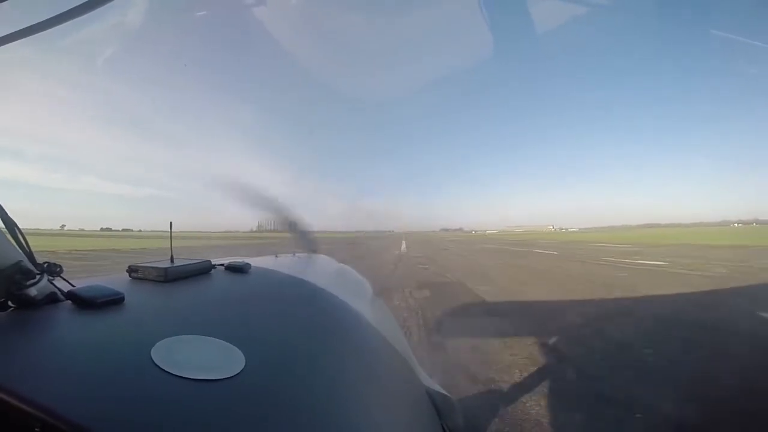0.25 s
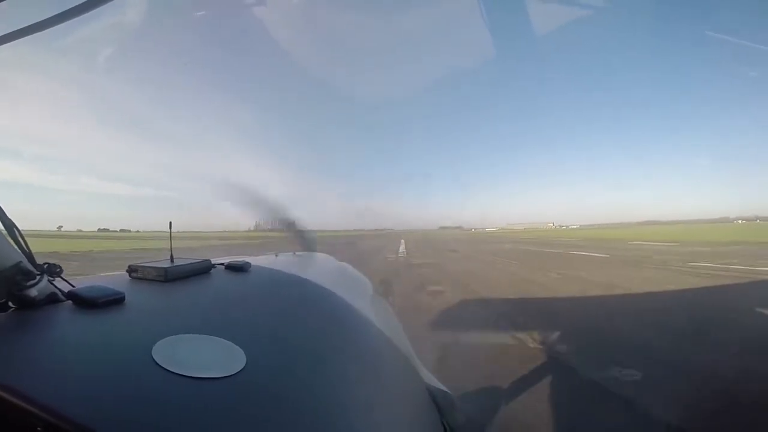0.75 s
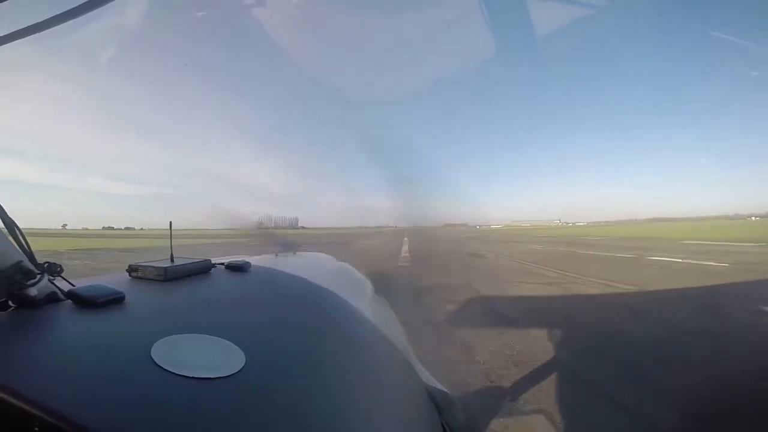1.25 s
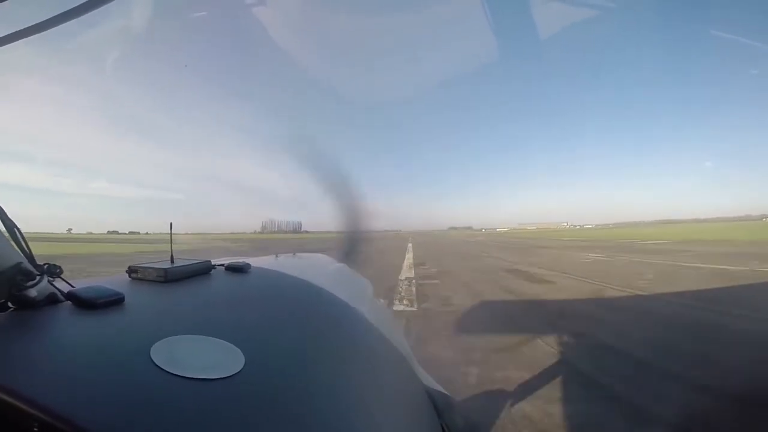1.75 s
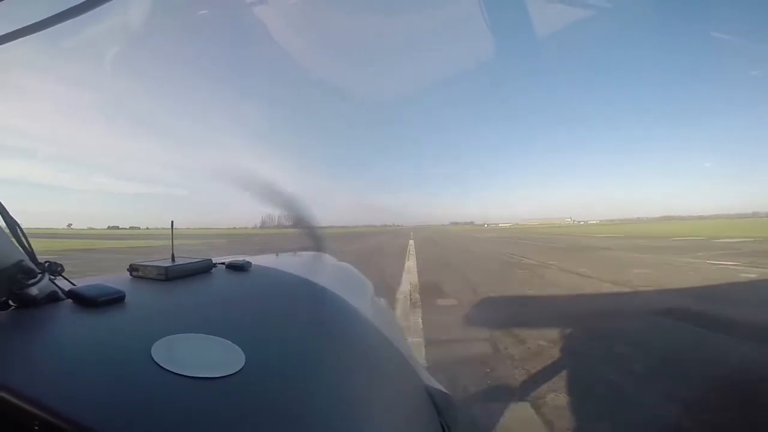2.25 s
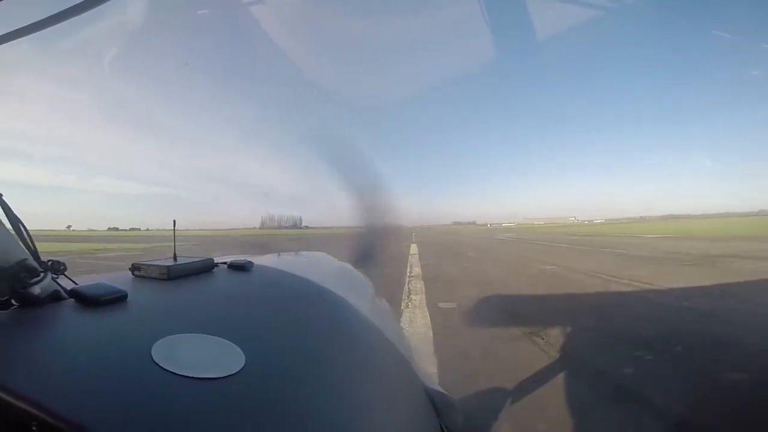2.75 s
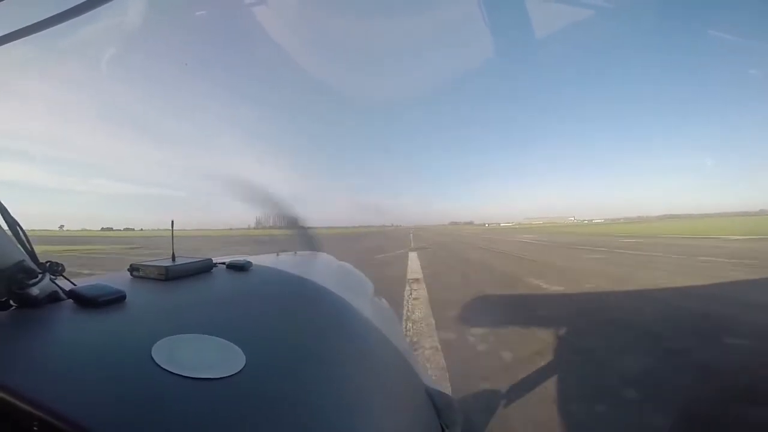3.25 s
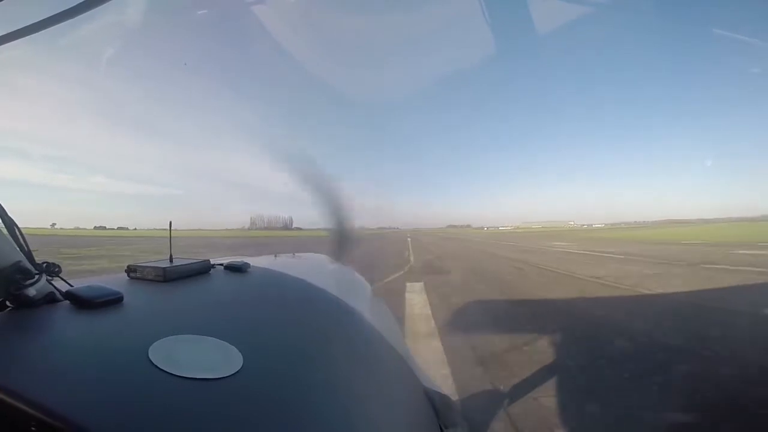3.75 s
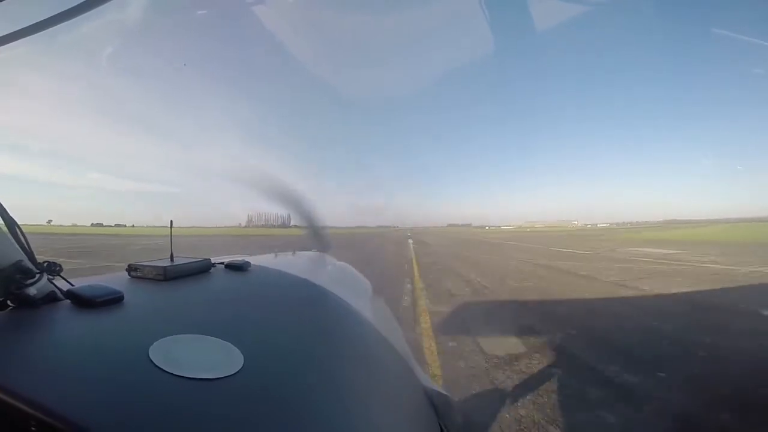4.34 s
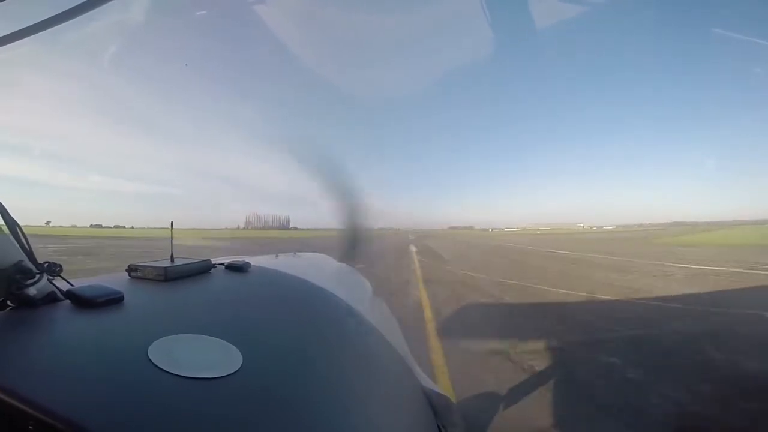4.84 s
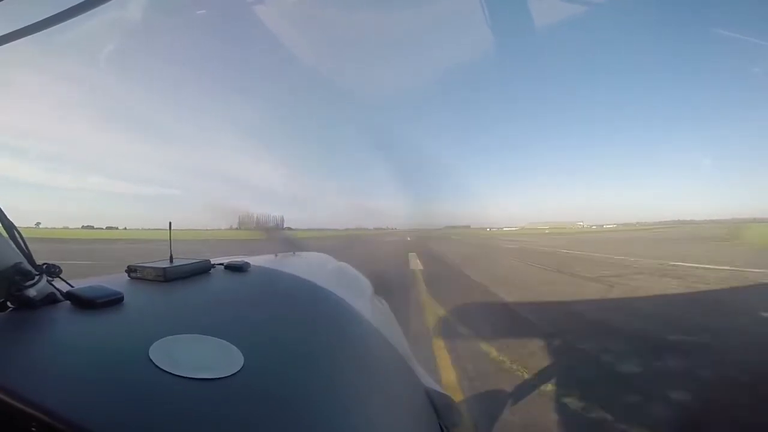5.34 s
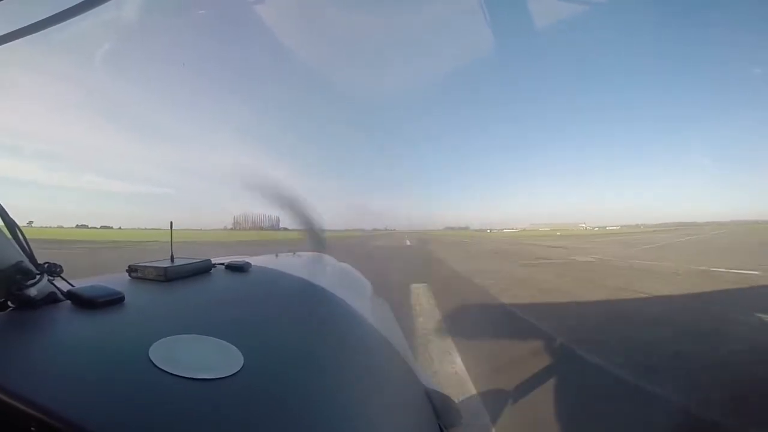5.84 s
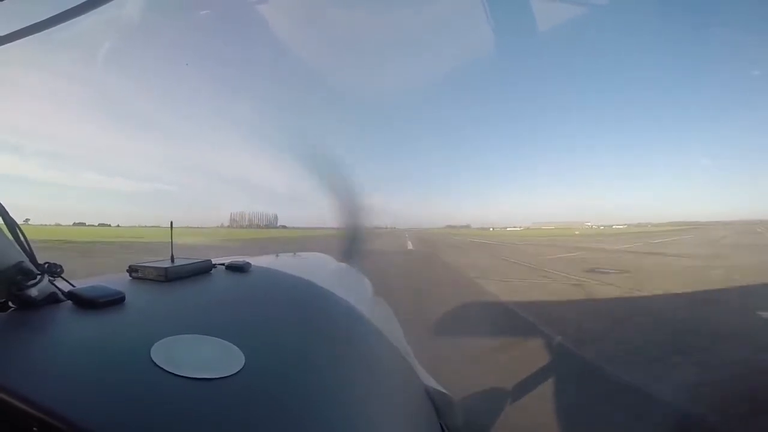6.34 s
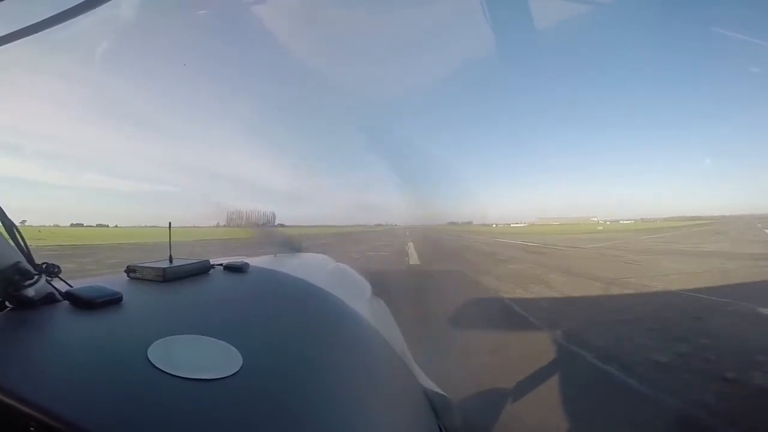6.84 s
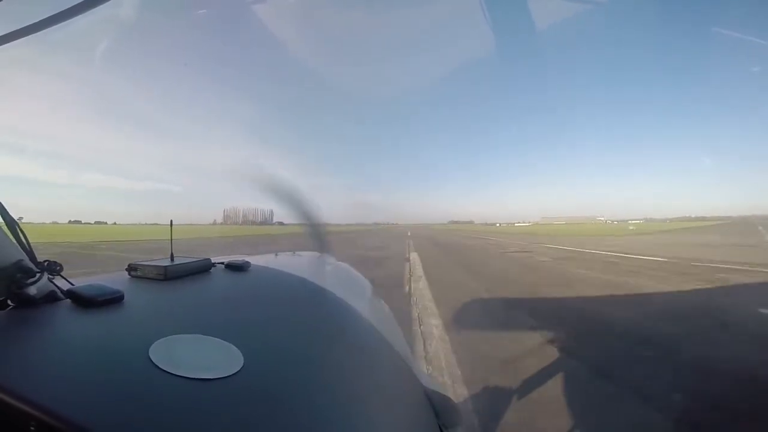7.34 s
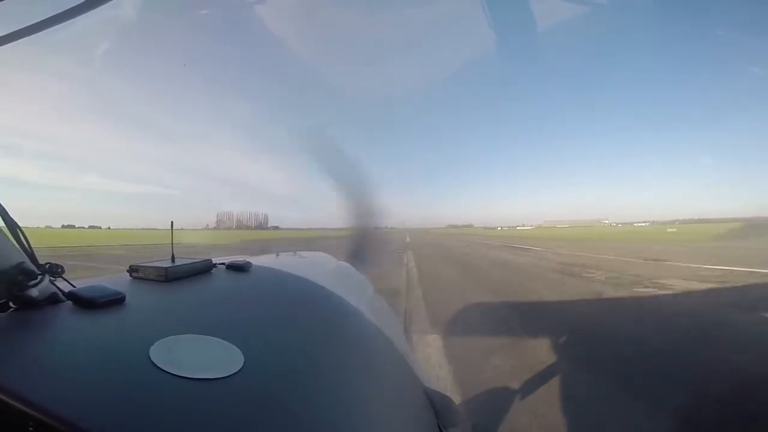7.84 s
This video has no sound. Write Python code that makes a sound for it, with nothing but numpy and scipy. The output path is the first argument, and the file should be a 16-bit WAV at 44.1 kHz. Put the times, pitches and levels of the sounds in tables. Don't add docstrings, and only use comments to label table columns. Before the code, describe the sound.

A continuous low engine and propeller drone fills a light aircraft cockpit, with midrange mechanical clatter and thin gear whine on top. Rapid sharp knocks come early, followed by a short hollow panel resonance around one second. The bumping eases into softer uneven thumps and cabin booms while the engine holds to the end. Close, boxy sound from a clamped, enclosed camera, nearly mono.

```python
import sys
import numpy as np
from scipy import signal
from scipy.fft import rfft, irfft, next_fast_len
from scipy.io import wavfile

SR = 44100
rng = np.random.default_rng(int(sys.argv[2]) if len(sys.argv) > 2 else 0)


def boost_factor(decibels):
    exponent = np.asarray(decibels, float) / 20
    return 10 ** exponent


def store_wav(level_fs):
    pcm = np.round(np.clip(np.atleast_2d(level_fs), -1, 1) * 32767)
    wavfile.write(sys.argv[1], SR, pcm.T.astype(np.int16))


N = 356769

# f/Hz, density/dB
HISS_SPECTRUM = [(3000, -6), (6000, -3.5), (10000, 3), (12500, 1), (13200, -3), (15150, -5)]
FIZZ_SPECTRUM = [(8000, -13), (9500, -6.5), (10500, -14.5), (12300, -11), (13000, -7), (14700, -10),
                 (15150, -3)]
RUMBLE_SPECTRUM = [(22, -24), (35, 3), (55, 0.5), (80, -2.5), (100, -6), (125, -7.5), (150, -8), (200, -35)]
HEAVE_SPECTRUM = [(8, -18), (15, -6), (25, 1), (33, 0), (48, -18)]
BOOM_SPECTRUM = [(110, -33), (150, -20), (175, -15.5), (200, -5.5), (250, -2), (300, -8), (370, -12.5),
                 (450, -13), (600, -19), (800, -30.5), (1100, -46)]
CLATTER_SPECTRUM = [(450, -28), (700, -4.5), (950, -7), (1800, -3.5), (2350, -1), (2700, -0.5),
                    (2900, -5.5), (3330, -9), (3620, -5.5), (3950, -9.5), (4900, -18), (5300, -20),
                    (5700, -26.5), (9500, -39)]
# start t/s, end t/s, level/dB
FIZZ_SPELLS = [
    (0.45, 1.0, -70),
    (1.0, 1.6, -74),
    (5.6, 6.4, -73),
    (6.4, 7.15, -70),
]
# t/s, peak level/dB
KNOCKS = [
    (0.537, -31),
    (0.647, -15.5),
    (0.674, -22),
    (0.699, -18),
    (0.749, -28),
    (0.79, -31),
    (0.83, -23),
    (0.886, -36),
    (0.911, -22),
]
# t/s, peak level/dB
TICKS = [(0.539, -44), (0.656, -45), (0.6748, -45), (0.6933, -40), (0.7035, -46), (0.748, -54),
         (0.7507, -45), (0.8064, -48), (0.8317, -46), (0.8374, -50), (0.8874, -48), (0.9117, -41.5),
         (0.9164, -52), (0.9214, -59)]
# t/s, level/dB
RUNWAY = [(0, -35.5), (0.9, -19.5), (1.3, -30.5), (1.8, -26.5), (2.4, -28), (2.9, -28.5), (4.3, -34),
          (5.1, -37), (5.5, -32.5), (6.3, -33), (7.1, -29.5), (7.4, -34.5), (8.09, -39)]
# t/s, heave level/dB, thump level/dB
BUMPS = [(0.04, -19.5, -22), (0.13, -30, -20), (0.2, -26, -24), (0.48, -32, -23), (0.54, -14, -22),
         (0.66, -24, -16), (0.9, -25, -23), (1.15, -31, -24), (1.37, -29, -26), (1.53, -21, -38),
         (1.75, -18, -25), (1.97, -23, -25), (2.27, -20, -37), (2.82, -23, -28), (3.2, -25, -30),
         (3.65, -28, -30), (3.92, -28, -24.5), (4.39, -39, -25.5), (5.2, -28, -33), (5.38, -34, -33),
         (5.75, -27, -22.5), (6.0, -33, -38), (6.15, -17.5, -24.5), (6.35, -28, -31), (6.55, -28, -29),
         (6.87, -25, -32), (7.07, -23, -35), (7.21, -22, -42), (7.61, -31, -34), (8.0, -23, -34)]
# t/s, level/dB
BOOMS = [(0.2, -30), (0.31, -39), (0.54, -26.5), (1.24, -28), (2.5, -31), (3.63, -32), (3.83, -25.5),
         (4.45, -28), (5.6, -29), (6.3, -25), (6.83, -25), (7.1, -27), (7.35, -28), (8.06, -28)]
# t/s, f/Hz, peak level/dB
DOOR = [
    (0.88, 257.3, -35.5),
    (1.046, 255.5, -21.5),
    (1.214, 248, -17),
    (1.3, 253.6, -25),
    (1.464, 249, -35),
]
# f/Hz, width/Hz, level/dB
PANELS = [(1239, 120, -20.5), (2192, 75, -18), (2347, 100, -15.5), (2438, 56, -17.5), (2608, 110, -15),
          (2742, 70, -28), (3670, 83, -18.5)]
# t/s, level change/dB
GUSTS = [
    (0.63, 1),
    (0.72, -4),
    (1.53, 1),
    (4.78, 0.5),
    (4.89, -1.5),
    (7.77, -1.5),
]
# t/s, speed/(turns/s)
CRANK = [(0, 86.434), (0.7, 86.17), (1.1, 85.89), (1.9, 85.79), (2.5, 85.535), (3.7, 85.325), (5.8, 85.245),
         (7.0, 85.275), (7.7, 85.37), (8.09, 85.377)]
TIMING_ORDERS = [63, 36, 41, 43, 44, 47, 49.28, 52, 55, 57, 58, 62, 64]
TIMING_LEVELS = [0.5, -13.5, -19, -5, -8.5, -10.5, -12, -3, -16, -6, -15, -19, -1]
# t/s, level/dB
TIMING_GRIP = [(0, -55), (0.5, -54), (1.12, -69), (1.8, -58), (2.8, -62), (3.1, -60), (4.3, -56.5),
               (8.09, -49.5)]
GEAR_ORDERS = [88, 82.72, 84, 86, 90, 85.36, 83, 85, 87, 90.64, 106.48]
GEAR_LEVELS = [2.5, -7, -19.5, -15, -15, -14, -17, -25.5, -15, -22, -20]
# t/s, level/dB
TOOTH_LOAD = [(0, -51.5), (0.48, -50), (0.64, -64), (0.8, -57), (1.28, -56), (1.44, -69), (1.6, -54.5),
              (1.85, -63), (2.27, -47), (2.68, -53), (3.2, -47), (3.6, -48.5), (4.16, -52.5), (4.6, -47.5),
              (5.9, -52.5), (6.5, -51.5), (7.3, -55.5), (8.09, -51.5)]
# t/s, level change/dB
BACKLASH = [
    (3.04, -6),
    (3.85, 0),
    (4.8, -4),
    (5.12, -12),
    (5.44, -2),
    (6.9, -2),
    (7.36, -3),
    (7.84, -7),
]
FIRING_ORDERS = [4, 1, 3, 5, 7, 8, 10, 11, 12, 15, 18, 19, 23, 25, 27]
FIRING_LEVELS = [3, -5.5, -5.5, -4.5, -1, -11, -6.5, -19.5, -20.5, -20, -47, -36, -27.5, -27, -36]
# t/s, level/dB
COMBUSTION = [(0, -39.5), (1.2, -41), (1.45, -37), (1.65, -38.5), (2.3, -38), (2.56, -35.5), (2.8, -39.5),
              (3.9, -38), (5.0, -37), (6.4, -36.5), (6.9, -34.5), (7.4, -38), (8.09, -37)]
BLADE_ORDERS = [3, 2, 4, 5, 6, .5]
BLADE_LEVELS = [1, -9.5, -22, -18, -9, -10]
# t/s, level/dB
BLADE_LOAD = [(0, -28), (0.3, -27.5), (0.95, -29), (1.6, -33.5), (2.6, -32.5), (3.1, -30), (3.8, -30.5),
              (4.1, -30.5), (5.0, -28), (5.9, -26), (6.5, -28.5), (7.1, -32), (7.4, -30), (8.09, -28.5)]
# t/s, level/dB
SHAKE = [(0, -29.5), (0.14, -17.5), (0.61, -17.5), (0.67, -9), (0.86, -14), (1.25, -17.5), (1.76, -16.5),
         (2.24, -19.5), (2.56, -27), (3.04, -25), (3.25, -31), (3.8, -29.5), (4.16, -35), (4.96, -30),
         (5.28, -32), (5.72, -31), (6.88, -27), (7.1, -32)]

SHAFT_PER_CYCLE = 44 / 50
CREST_JOLT_S = 0.7022
SLACK_S, SLACK_WIDTH_S, SLACK_DB = 1.97, 0.13, -13.0


def seconds():
    return np.arange(N) / SR


def curve(rows):
    s, values = np.transpose(rows)
    return np.interp(seconds(), s, values)


def rms_one(x):
    return x / np.sqrt(np.mean(x ** 2) + 1e-20)


def in_db(*gains):
    return 10 * np.log10(sum(g ** 2 for g in gains) + 1e-12)


def bell(centre_s, width_s):
    return np.exp(-0.5 * ((seconds() - centre_s) / width_s) ** 2)


def swell(centre_s, rise_s, fall_s):
    late = seconds() - centre_s
    return np.exp(np.minimum(late / rise_s, -late / fall_s))


def spell(start_s, end_s, edge_s):
    opening = np.tanh((seconds() - start_s) / edge_s)
    closing = np.tanh((seconds() - end_s) / edge_s)
    return (opening - closing) / 2


def drift(rate_hz):
    hop = 40
    r = np.exp(-2 * np.pi * rate_hz * hop / SR)
    white = rng.standard_normal(N // hop + 2002)
    slow = signal.lfilter([1], [1, -2 * r, r * r], white)[2000:]
    return np.interp(np.arange(N) / hop, np.arange(len(slow)), rms_one(slow))


def noise(spectrum, patchy_db, rate):
    size = next_fast_len(N)
    octave = np.log2(np.arange(1, size // 2 + 2) * SR / size)
    hz, level_db = np.transpose(spectrum)
    shape = boost_factor(np.interp(octave, np.log2(hz), level_db, -120, -120))
    coloured = rfft(rng.standard_normal(size)) * shape
    out = np.zeros(N)
    for centre in np.arange(np.floor(np.log2(hz[0])), np.log2(hz[-1]) + 0.5, 0.5):
        window = np.cos(np.pi * np.clip(octave - centre, -0.5, 0.5)) ** 2
        out += irfft(coloured * window, size)[:N] * boost_factor(patchy_db * drift(rate))
    return rms_one(out)


def resonance(hz, width_hz):
    r = np.exp(-np.pi * width_hz / SR)
    mode = [1, 0, -1, 1, -2 * r * np.cos(2 * np.pi * hz / SR), r * r]
    return rms_one(signal.sosfilt([mode, mode], rng.standard_normal(N)))


def blows(events, decay_s):
    jumps = np.zeros(N)
    for s, peak_db in events:
        jumps[round(s * SR)] = boost_factor(peak_db)
    return signal.lfilter([1], [1, -np.exp(-1 / (decay_s * SR))], jumps + 1e-18)


def lines(turns, orders, levels_db, wobble_db, rate, slip):
    out = np.zeros(N)
    for order, level_db in zip(orders, levels_db):
        gain = np.sqrt(2) * boost_factor(level_db + wobble_db * drift(rate))
        phase = 2 * np.pi * (order * turns + rng.random()) + slip * drift(rate)
        out += gain * np.sin(phase)
    return out


def preamp_hiss():
    shared = noise(HISS_SPECTRUM, patchy_db=0.8, rate=6.3)
    own = noise(HISS_SPECTRUM, patchy_db=0.8, rate=6.3)
    return boost_factor(-70) * shared, boost_factor(-70 - 3.0) * own


def case_fizz():
    spells = [boost_factor(level_db) * np.sqrt(spell(start_s, end_s, edge_s=0.1))
              for start_s, end_s, level_db in FIZZ_SPELLS]
    level_db = in_db(boost_factor(-75), *spells) + 1.3 * drift(14)
    return boost_factor(level_db + 1.0) * noise(FIZZ_SPECTRUM, patchy_db=0.7, rate=40)


def case_squeak():
    top_s, top_hz, arch_hz_per_s2 = 2.93, 8520, 30000
    hz = np.maximum(top_hz - arch_hz_per_s2 * (seconds() - top_s) ** 2, 0)
    return boost_factor(-64) * bell(2.905, 0.025) * np.sin(2 * np.pi * np.cumsum(hz) / SR)


def case_knocks():
    wall = signal.butter(2, [80, 700], "band", fs=SR, output="sos")
    return boost_factor(8.5) * signal.sosfilt(wall, blows(KNOCKS, decay_s=0.00082))


def ticks():
    mid, side = rng.standard_normal((2, N))
    bursts = boost_factor(-4.0) * blows(TICKS, decay_s=0.0033) * (mid + 1.3 * side * [[1], [-1]])
    return signal.sosfilt(signal.butter(1, 1200, "high", fs=SR, output="sos"), bursts)


def door_panel():
    out = np.zeros(N)
    for s, hz, level_db in DOOR:
        gain = np.sqrt(2) * boost_factor(level_db - 4.0)
        out += gain * swell(s, rise_s=0.019, fall_s=0.058) * np.sin(2 * np.pi * hz * seconds())
    return out


def wheels_and_cabin():
    rough_db = curve(RUNWAY)
    bumps = [(swell(s, rise_s=0.035, fall_s=0.052), heave_db, thump_db) for s, heave_db, thump_db in BUMPS]
    heaves = [boost_factor(heave_db) * shape for shape, heave_db, _ in bumps]
    thumps = boost_factor(in_db(*[boost_factor(thump_db) * shape for shape, _, thump_db in bumps]))
    booms = [boost_factor(level_db) * swell(s, rise_s=0.041, fall_s=0.045) for s, level_db in BOOMS]
    steady_boom = boost_factor(-28.5 + 0.3 * (rough_db - rough_db.mean()) + drift(7.8))
    heave_db = in_db(boost_factor(rough_db - 4.5), *heaves)
    rumble_db = in_db(boost_factor(rough_db - 2), thumps)
    boom_db = in_db(steady_boom, boost_factor(-11) * thumps, *booms)
    rumble = boost_factor(rumble_db + 2.5) * noise(RUMBLE_SPECTRUM, patchy_db=1.5, rate=8.8)
    heave = boost_factor(heave_db - 0.2) * noise(HEAVE_SPECTRUM, patchy_db=-2.5, rate=6)
    boom = boost_factor(boom_db - 1.5) * noise(BOOM_SPECTRUM, patchy_db=0.65, rate=6.1)
    return rumble + heave + boom


def clatter():
    level_db = -38.0 - 0.0767 * seconds()
    level_db += sum(change_db * bell(s, 0.04) for s, change_db in GUSTS)
    panels = sum(boost_factor(panel_db + 1.9 * drift(3.1)) * resonance(hz, width_hz)
                 for hz, width_hz, panel_db in PANELS)
    dense = noise(CLATTER_SPECTRUM, patchy_db=0.5, rate=15)
    return boost_factor(level_db - 1.0 + 0.56 * drift(33)) * (dense + panels)


def timing_train(cycles):
    level_db = curve(TIMING_GRIP) + 3 * drift(3.8)
    tones = lines(cycles, TIMING_ORDERS, TIMING_LEVELS, wobble_db=1.5, rate=10, slip=0.5)
    return boost_factor(level_db - 0.7) * tones


def gear_whine(cycles):
    level_db = curve(TOOTH_LOAD) + 0.8 * drift(4.3)
    level_db += sum(change_db * bell(s, 0.074) for s, change_db in BACKLASH)
    tones = lines(cycles, GEAR_ORDERS, GEAR_LEVELS, wobble_db=1.2, rate=14, slip=0.4)
    return boost_factor(level_db - 0.3) * tones


def firing(cycles):
    level_db = curve(COMBUSTION) + SLACK_DB * bell(SLACK_S, SLACK_WIDTH_S)
    tones = lines(cycles, FIRING_ORDERS, FIRING_LEVELS, wobble_db=1.8, rate=5, slip=0.45)
    return boost_factor(level_db + 1.3) * tones


def propeller(cycles):
    shaft = SHAFT_PER_CYCLE * (cycles - cycles[round(CREST_JOLT_S * SR)])
    shake_db = curve(SHAKE)
    waver_db = 1.5 + 0.15 * np.maximum(-26.5 - shake_db, 0)
    shake_db = shake_db + waver_db * drift(4.3)
    shake = np.cos(2 * np.pi * shaft) + 0.16 * np.cos(4 * np.pi * shaft - 0.4)
    beat_db = curve(BLADE_LOAD) + SLACK_DB * bell(SLACK_S, SLACK_WIDTH_S)
    beat = lines(shaft, BLADE_ORDERS, BLADE_LEVELS, wobble_db=1.2, rate=5, slip=0.35)
    return np.sqrt(2) * boost_factor(shake_db + 0.73) * shake + boost_factor(beat_db + 0.63) * beat


def scene():
    cycles = np.cumsum(curve(CRANK)) / (2 * SR)
    case = case_fizz() + case_squeak() + case_knocks()
    airframe = door_panel() + wheels_and_cabin()
    engine = clatter() + timing_train(cycles) + gear_whine(cycles) + firing(cycles)
    return case + airframe + engine + propeller(cycles) + ticks()


def low_pass(x):
    return signal.sosfilt(signal.butter(12, 15560, fs=SR, output="sos"), x)


def record(dry):
    deep = signal.sosfilt(signal.butter(2, 90, fs=SR, output="sos"), dry)
    uneven = np.clip(boost_factor(18) * blows(TICKS, decay_s=0.025), 0, 0.2) * drift(30)
    shared, own = preamp_hiss()
    apart = boost_factor(-36.5) * deep + uneven * (dry - deep) + own
    heard = np.clip(dry + shared + apart * [[1], [-1]], -0.78, 0.78)
    fade = np.minimum(1, np.arange(N)[::-1] / (0.004 * SR))
    return low_pass(heard * fade)


dry = scene()
out = record(dry)
store_wav(out)
```